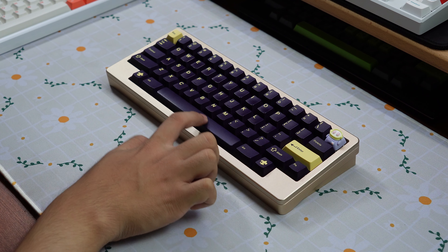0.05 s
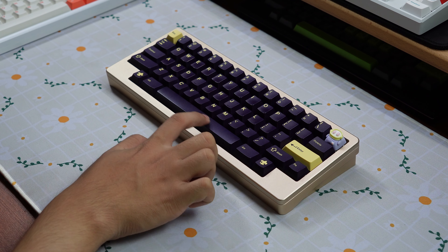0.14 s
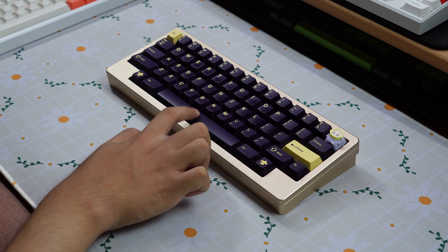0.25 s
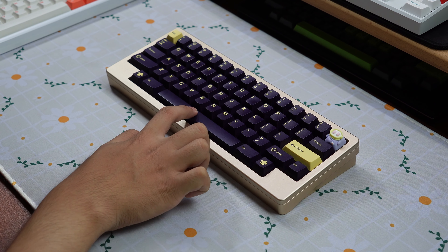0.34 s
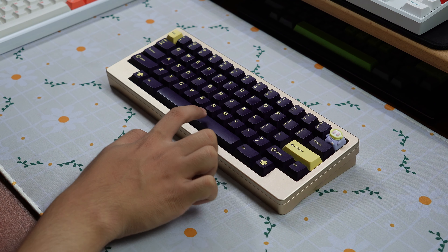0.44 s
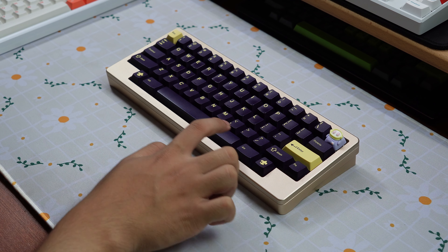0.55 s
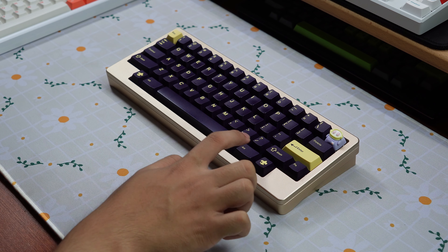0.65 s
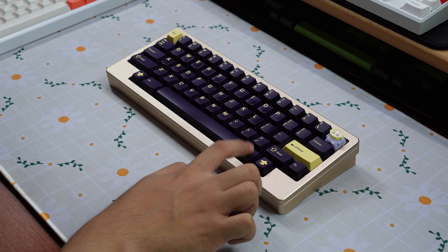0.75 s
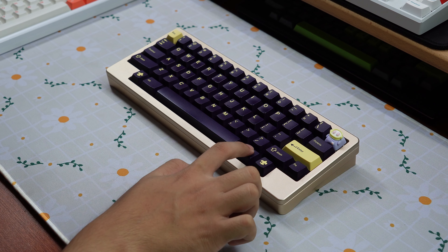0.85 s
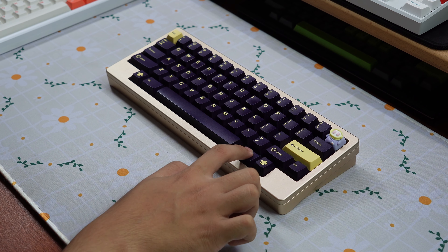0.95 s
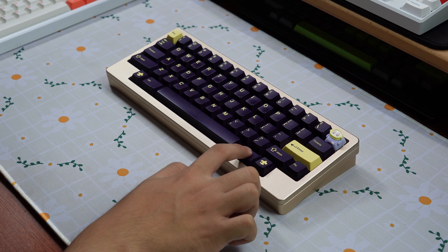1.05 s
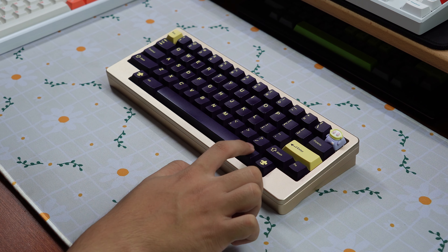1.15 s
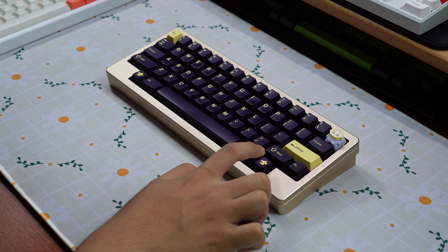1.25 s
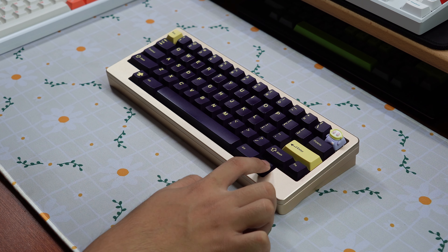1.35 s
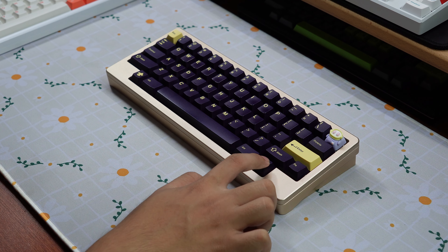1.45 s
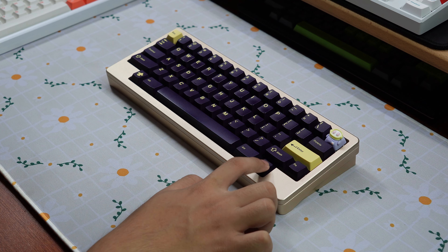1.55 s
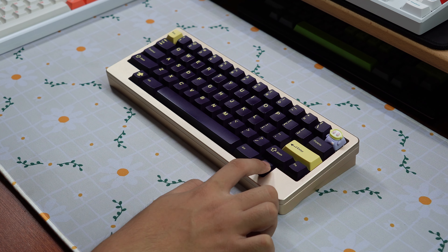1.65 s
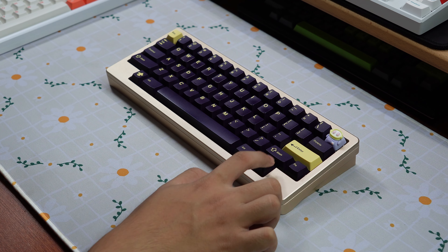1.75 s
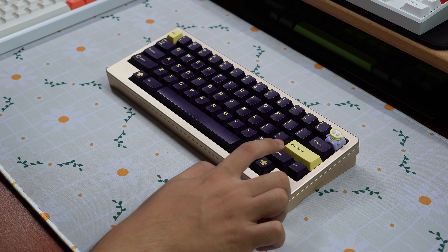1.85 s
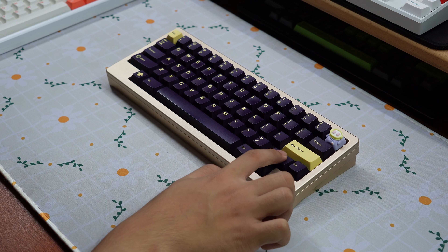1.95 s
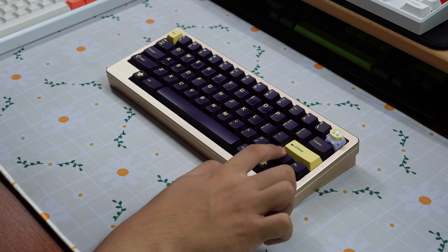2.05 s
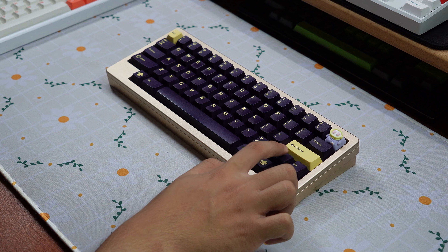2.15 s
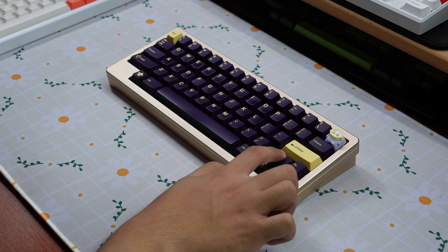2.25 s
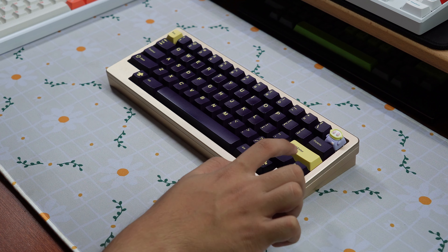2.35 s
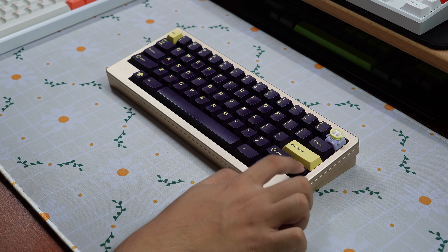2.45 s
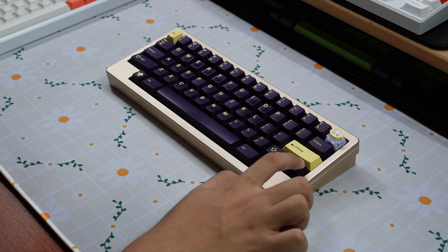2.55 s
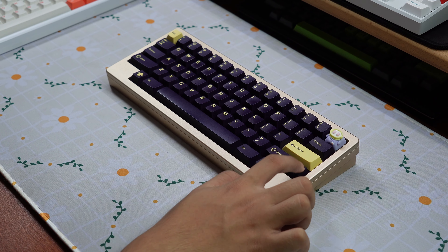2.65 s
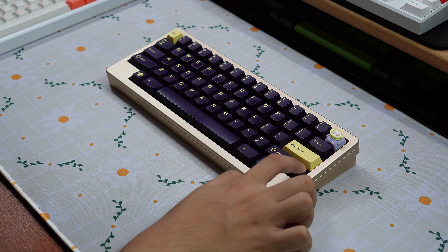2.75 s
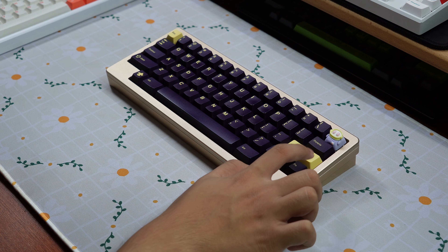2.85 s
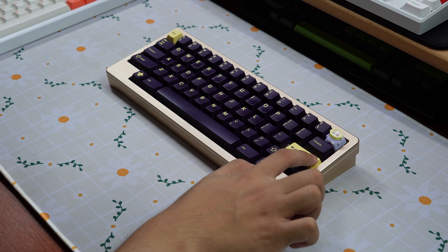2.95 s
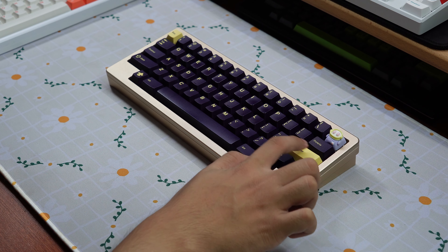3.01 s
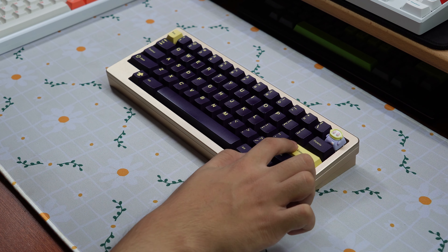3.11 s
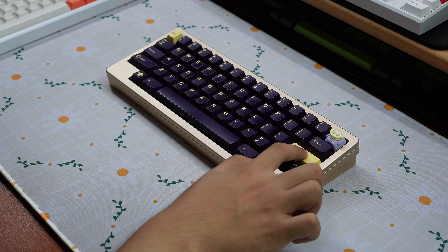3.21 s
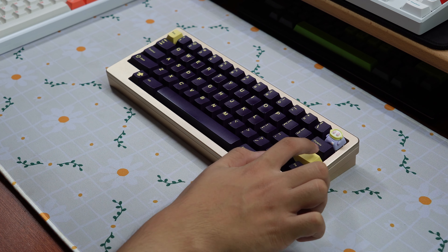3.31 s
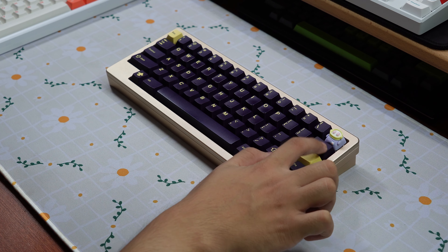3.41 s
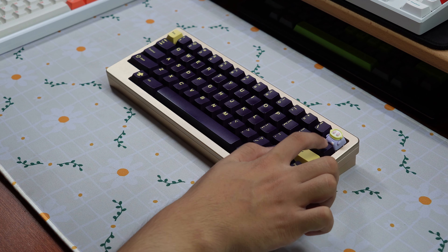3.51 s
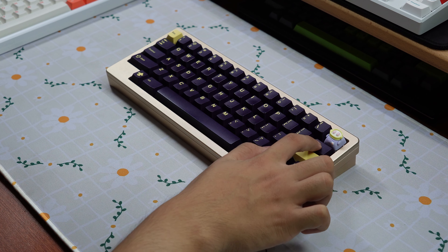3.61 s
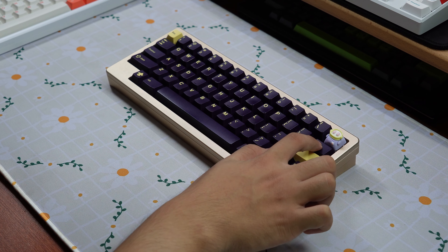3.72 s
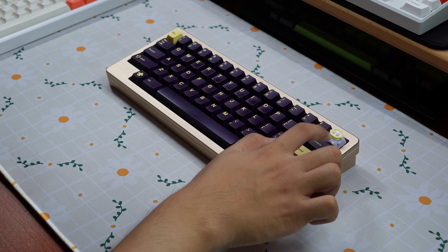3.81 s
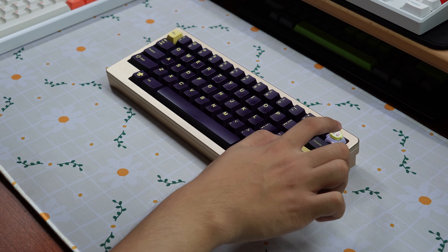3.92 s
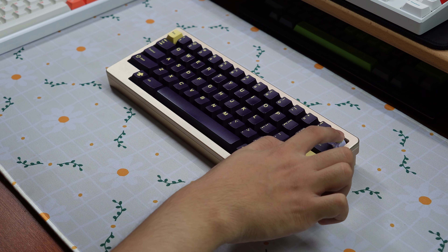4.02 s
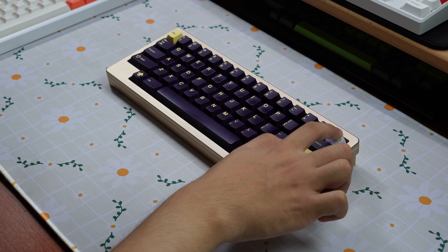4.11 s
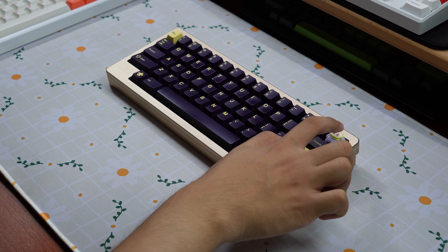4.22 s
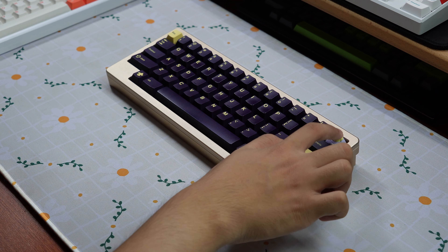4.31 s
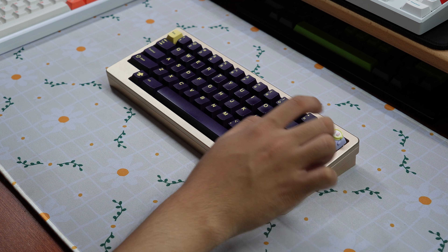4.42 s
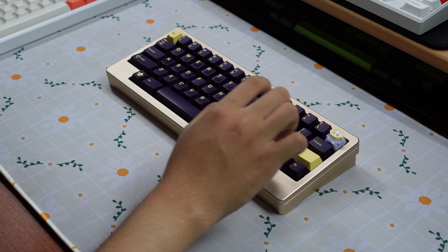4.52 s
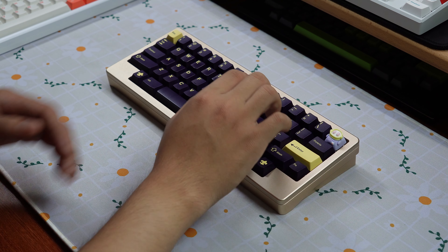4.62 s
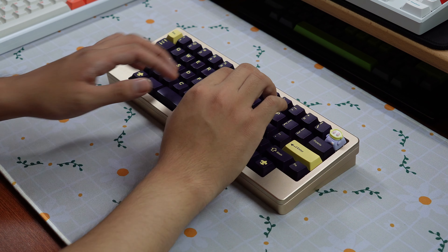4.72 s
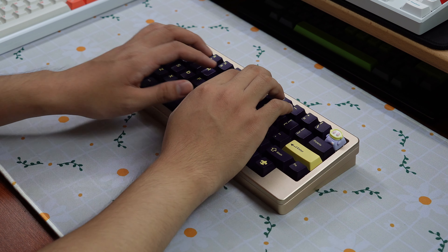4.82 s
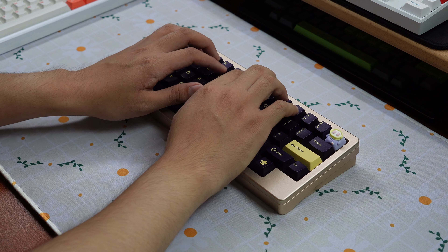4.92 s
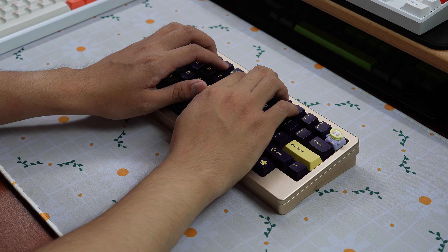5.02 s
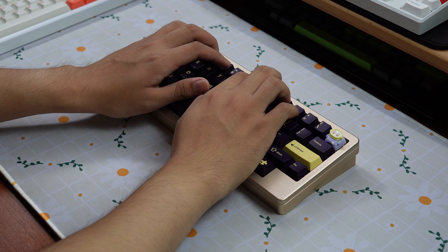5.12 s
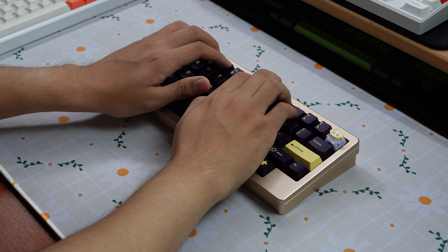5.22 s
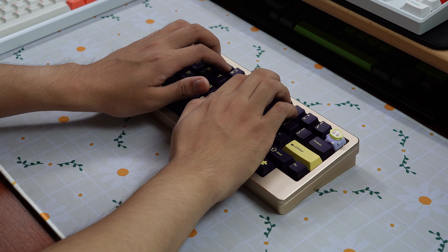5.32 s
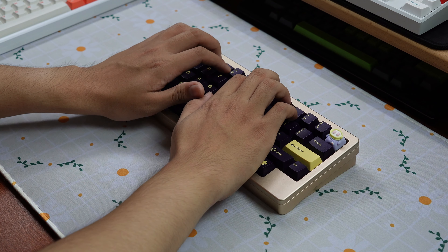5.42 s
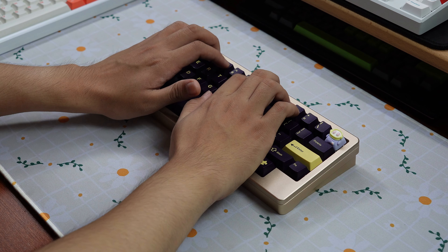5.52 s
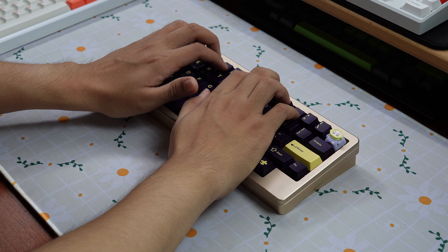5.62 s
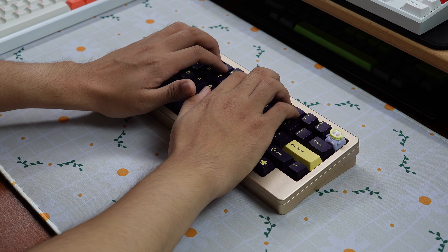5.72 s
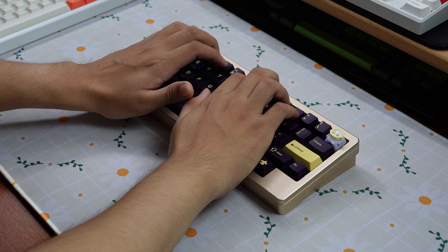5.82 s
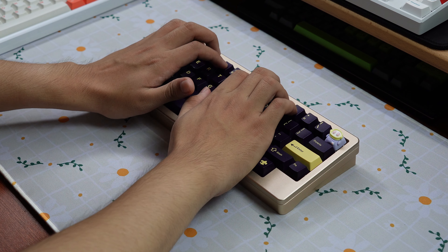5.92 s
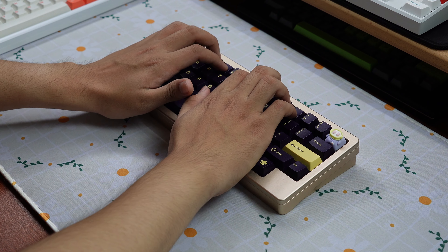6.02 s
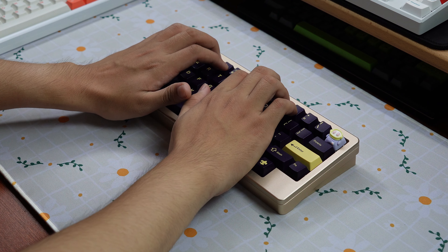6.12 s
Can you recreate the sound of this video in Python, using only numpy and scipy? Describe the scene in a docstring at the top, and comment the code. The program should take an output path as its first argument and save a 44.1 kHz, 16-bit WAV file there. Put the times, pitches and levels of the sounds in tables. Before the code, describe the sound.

Close to a heavy mechanical keyboard in a small room, one finger works along eight large keys, about three firm clack-and-release presses each, with short gaps between keys. Tone and loudness change from key to key, the last being faint. After a pause with a barely audible brush of forearms, two hands type a fast, lighter rattle to the end. Low distant engines and hum lie underneath.

```python
"""One finger taps eight large keys of a heavy mechanical keyboard in turn, three presses and releases each
(four on the first, whose first press lands just before the start), over far engines, a low drone, air and hum.
Then the forearms brush the mat, fingertips settle, and both hands rattle quickly over the letters.
A landing is a noisy contact that excites resonances of cap, stem, housing and case, plus a desk thump;
the small room adds echoes and a diffuse tail. Engines and hum are tones with noise; the rest is filtered noise."""
import sys
import numpy as np
from scipy import signal
from scipy.fft import rfft, irfft
from scipy.io import wavfile
from scipy.ndimage import uniform_filter1d

SR = 44100
rng = np.random.default_rng(int(sys.argv[2]) if len(sys.argv) > 2 else 0)


def generate_wav(sig):
    """Save sig (samples, or channels by samples) to the path in sys.argv[1] as 16-bit PCM at SR."""
    pcm = np.round(np.clip(np.atleast_2d(sig).T, -1, 1) * 32767).astype(np.int16)
    wavfile.write(sys.argv[1], SR, pcm)


N = 271656


def gain_of(db):
    """Decibel law: amplitude ratio of a level in dB."""
    return 10 ** (np.asarray(db) / 20)


def evened(x):
    """Energy normalisation: scales to rms 1."""
    return x / np.sqrt(np.mean(x ** 2) + 1e-20)


def topped(x):
    """Peak normalisation: scales to peak 1."""
    return x / (abs(x).max() + 1e-20)


def read_spectrum(points, hz):
    """Log-frequency interpolation between the points of a spectrum."""
    f, value = np.transpose(points)
    return np.interp(np.log(hz + 1), np.log(f + 1), value)


def coloured_noise(points):
    """Spectral shaping: white noise filtered to the given spectrum, rms 1."""
    hz = np.fft.rfftfreq(N, 1 / SR)
    spectrum = rfft(rng.standard_normal(N)) * gain_of(read_spectrum(points, hz))
    return evened(irfft(spectrum, N))


def resonate(x, hz, width_hz):
    """Damped resonance: a two-pole filter whose pole radius sets the bandwidth."""
    r = np.exp(-np.pi * width_hz / SR)
    return signal.lfilter([1, 0, -1], [1, -2 * r * np.cos(2 * np.pi * hz / SR), r * r], x)


def ring(modes, t):
    """Modal superposition: sines that each die exponentially after a blow."""
    return sum(gain_of(db - 60 * t / t60) * np.sin(2 * np.pi * hz * t) for hz, db, t60 in modes)


def blurred_click(peaks, size=1024):
    """Power addition: a short zero-phase click whose power spectrum sums humps (Hz, width Hz, dB)."""
    hz = np.fft.rfftfreq(size, 1 / SR)
    power = sum(gain_of(2 * db) / (1 + (2 * (hz - f) / w) ** 2) ** 2 for f, w, db in peaks)
    click = np.roll(irfft(np.sqrt(power)), 100)[:400]
    return click * signal.windows.tukey(400, .3)


def landings():
    """Alternation of travel: per stroke, its key and that key's earlier landings (even: down, odd: up)."""
    key = [sum(k[0] <= row[0] for k in KEY_RESONANCES) - 1 for row in STROKES]
    return [(k, key[:n].count(k)) for n, k in enumerate(key)]


# resonances of the key in use; the last row serves all the letters:
# start_s [s], hollow_hz [Hz], ring_hz [Hz], sizzle_hz [Hz], spot_hz favoured by the case here [Hz]
KEY_RESONANCES = [(-1, 1750, 6200, 12000, 1100), (.7, 1700, 6300, 9500, 950), (1.3, 1900, 6000, 10700, 800),
                  (1.9, 1800, 6500, 11700, 1000), (2.45, 1850, 6000, 10500, 750),
                  (2.95, 1750, 6500, 11800, 720), (3.4, 1800, 6200, 10500, 1250),
                  (4.01, 2300, 5500, 7900, 900), (4.8, 2450, 5500, 12000, 1040)]
# how strongly each key sends its resonances round the room, before fixed trims:
# hollow_db [dB], ring_db [dB], sizzle_db [dB], clatter_db [dB]
KEY_SPREAD = [(-0.5, -0.5, -11.5, 9.5), (0.5, 8, -3, 5), (2, -9, -12.5, 3), (2, 14.5, -3.5, 7),
              (0.5, -6, -8.5, 4), (1, 14.5, -3, 5.5), (1, -8.5, -7, 3), (-2.5, -22, -4, 4),
              (2, -12, -15, 6.5)]
# breadth of each key's hollow resonance: width_hz [Hz]
HOLLOW_WIDTH_HZ = [930, 700, 560, 600, 560, 595, 700, 900, 700]
# how each key lands going down: knock_db of the case for a blow of middle strength, before trims [dB],
# stem_hz before scatter [Hz], desk_db relative to the stroke, before scatter [dB], rattle_ms before scatter [ms]
LANDING_DOWN = [(-30, 2960, -19.5, 2.2), (-28, 5860, -22, 2.2), (-35.5, 5800, -28, 0.84),
                (-31.5, 6400, -27, 2.4), (-45, 5500, -55, 0.73), (-30.5, 6600, -30, 2.3),
                (-38, 2900, -30, 0.45), (-26.5, 3100, -34, 2), (-26, 3340, -13.5, 4.1)]
# how each key lands coming up: knock_db [dB], stem_hz [Hz], desk_db [dB], rattle_ms [ms], as above
LANDING_UP = [(-23.5, 3000, -15.5, 5.4), (-24, 5830, -21, 1.9), (-28.5, 6440, -28, 2),
              (-31.5, 4230, -20, 3.3), (-37, 2000, -53, 1.7), (-27, 3340, -28, 2), (-31, 5700, -26.5, 1.3),
              (-29, 7200, -8, 1.8), (-24, 6090, -14, 4)]
# modes of the case: pitch_hz [Hz], relative level_db [dB], t60_s [s]
CASE_MODES = [(711, -20, 0.032), (800, 0, 0.022), (1099, 2, 0.035), (1200, 2, 0.03), (1295, 15, 0.012)]
# modes of the desk: pitch_hz [Hz], relative level_db [dB], t60_s [s]
DESK_MODES = [(88, -9, 0.033), (124, -3.5, 0.05), (191, -5, 0.019), (365, -45.5, 0.024)]
# resonances of steel parts in the keys: pitch_hz [Hz], width_hz [Hz]
STEEL_PARTS = [(6100, 290), (7100, 450), (9840, 300), (12000, 400)]
# how much each key stirs them: one column per steel part, added to the stroke's stem_db [dB]
STEEL_DB = [(14, 10, 0, 4), (33, 28, 2, 2), (12, 8, 4, 2), (20, 20, 6, 16), (10, 12, 4, 2), (14, 14, 2, 4),
            (32, 20, 12, 9), (8, 12, -2, 0), (12, 12, 2, 8)]
MIDDLE_DB, KNOCK_FOLLOWS = -20, 0.37  # middle blow, dB; share of a stronger blow that reaches the case
FIRST_THUMP_DB = 6  # the hand arriving at a new key jolts the desk more
SCATTER_DB, SCATTER_SHARE = 1, 0.14  # knock and thump, dB; rattle length, log ratio
NOTE_SCATTER, LETTER_SCATTER = .03, .2  # stem note, log ratio: one key nearly keeps it, the letters differ


def stroke(row, key, before, noise, lead_s=.01):
    """Impact excitation: the stem slides, lands and rattles; gives start sample, near sound and room feed."""
    s, peak_db, cap_hz, stem_db, tick_db = row
    knock_db, stem_hz, desk_db, rattle_ms = (LANDING_UP if before % 2 else LANDING_DOWN)[key]
    _, hollow_hz, ring_hz, sizzle_hz, spot_hz = KEY_RESONANCES[key]
    hollow_db, ring_db, sizzle_db, clatter_db = KEY_SPREAD[key]

    # no two landings alike
    knock_chance, thump_chance, note_chance, rattle_chance = noise[1, -4:]
    case_db = knock_db + KNOCK_FOLLOWS * (peak_db - MIDDLE_DB) + SCATTER_DB * knock_chance - peak_db
    desk_db = desk_db + SCATTER_DB * thump_chance + FIRST_THUMP_DB * (before == 0)
    is_letter = key == len(KEY_RESONANCES) - 1
    stem_hz = stem_hz * np.exp((LETTER_SCATTER if is_letter else NOTE_SCATTER) * note_chance)
    rattle_ms = rattle_ms * np.exp(SCATTER_SHARE * rattle_chance)

    # the contact noise: sliding, rattle and one sharp blow
    lead = round(lead_s * SR)
    clock = np.arange(len(noise[0])) / SR
    t = np.maximum(clock - lead_s, 0)
    sliding = clock / lead_s * (t == 0)  # friction grows until the landing
    rattle_s = max(rattle_ms, .2) / 1000
    settling = np.exp(-t / rattle_s) + 0.15 * np.exp(-t / 0.004)  # small bounces linger after the rattle
    contact = (1 - np.exp(-t / 0.00041)) * settling * noise[0] ** 3 * 1.9  # the cube makes it spiky
    contact += gain_of(-33) * sliding * noise[1]
    contact[lead + 8] += 2.5

    # the cap swings a few cycles and is damped at once by the finger and the foam
    swing = (1 - np.exp(-t / 0.00066)) * np.exp(-(t / 0.0017) ** 2) * np.sin(2 * np.pi * cap_hz * t)
    cap = topped(swing) + 0.4 * topped(resonate(contact, cap_hz * 1.19, 310))
    knocked = signal.fftconvolve(contact, ring(CASE_MODES, t[t > 0]))[:len(t)]
    case = topped(resonate(knocked, spot_hz, 446.4))
    stem = 1.63 * topped(resonate(contact, stem_hz, 420)) + 2.77 * topped(resonate(contact, 2800, 3500))
    tick = topped(resonate(contact, sizzle_hz, 1300)) + 1.7 * topped(resonate(contact, 11000, 4900))
    desk = topped((1 - np.exp(-t / 0.0016)) ** 2 * ring(DESK_MODES, t))

    near = gain_of(-1.5) * cap + gain_of(case_db - 2.5) * case + gain_of(desk_db) * desk
    first = 0.31 + 0.49 * np.exp(-t / 0.00091)  # the first contact is the brightest
    near += first * gain_of(stem_db + 5.5) * stem
    near += first ** 2 * gain_of(tick_db - 3.0) * tick

    # off to the sides the rattle blurs and the key's own resonances remain
    peaks = [(hollow_hz, HOLLOW_WIDTH_HZ[key], hollow_db + 26.5),
             (ring_hz, 1100, stem_db + ring_db + 12.5),
             (3500, 6000, stem_db + clatter_db + 21),
             (sizzle_hz, 1100, tick_db + sizzle_db + 24.5),
             (9000, 9000, tick_db + clatter_db + 3.5)]
    peaks += [(f, w, db + stem_db) for (f, w), db in zip(STEEL_PARTS, STEEL_DB[key])]
    far = gain_of(case_db - 8) * case
    far[lead:][:400] += blurred_click(peaks)
    return round((s - lead_s + 0.00031) * SR), gain_of(peak_db) * np.array([near, far])


# every landing of a key, down on the plate and up at its stop in turn: start_s [s], level_db before trims [dB],
# pitch_hz of the cap [Hz], stem_db and tick_db of stem ring and housing tick, relative, before trims [dB]
STROKES = [(-.008, -7, 2100, -18, -20.5), (0.0681, -18, 1680, -13, -27), (0.123, -6.5, 1680, -13, -21),
           (0.205, -16.5, 1720, -17.5, -30), (0.2678, -8, 1860, -17, -14), (0.3316, -17, 1720, -15.5, -29),
           (0.391, -4.5, 1860, -22.5, -15), (0.4842, -19, 1640, -11, -22), (0.83, -16.5, 2100, -9.5, -7),
           (0.9108, -24.5, 1700, -4.5, -18), (0.9677, -21, 1620, -6, -31), (1.0521, -27.5, 1670, -3.5, -26),
           (1.1119, -23, 1620, -6.5, -6), (1.204, -21, 1910, -2.5, -20), (1.4087, -14.5, 1980, -17, 6),
           (1.494, -20, 1970, -9.5, 7), (1.5549, -15, 1970, -17, -8), (1.6347, -21.5, 1960, -4.5, 8),
           (1.6926, -15.5, 1950, -18.5, 5.5), (1.7958, -17.5, 1920, -10, 3), (1.9809, -15, 1864, -7.5, -11),
           (2.0558, -16.5, 2020, -9.5, -11), (2.1279, -19.5, 1847, -11.5, -9), (2.1968, -17, 1900, -9, -6),
           (2.256, -19, 1997, -9.5, -13), (2.3527, -19, 1885, -6, -17), (2.5187, -7.5, 1950, -21, -3.5),
           (2.5849, -12, 1850, -15.5, -12), (2.648, -11.5, 1926, -24, -3.5),
           (2.7267, -12.5, 2140, -13.5, -7), (2.7826, -12, 1950, -22.5, -5), (2.8669, -11.5, 2020, -16, -7),
           (2.9898, -12, 1793, -14, -12), (3.0579, -14, 1900, -12.5, -25), (3.1251, -26, 1900, -4, 0),
           (3.2006, -23, 1980, -7.5, -13), (3.2581, -16.5, 1877, -15.5, -11),
           (3.3411, -22.5, 1950, -11.5, -28), (3.4961, -16, 1952, -8.5, -13),
           (3.5679, -13.5, 1940, -12, -8), (3.6382, -21, 1900, -9.5, -23), (3.708, -22, 1860, -5.5, -27),
           (3.7598, -20, 1947, -8.5, -22), (3.8431, -18, 2005, -6.5, -36), (4.0668, -24.5, 2040, -5.5, -6),
           (4.1315, -32.5, 2140, 3.5, 8), (4.1959, -28.5, 2140, -14, 3), (4.2599, -31, 2600, 2, 8),
           (4.334, -30.5, 2080, -3.5, -5), (4.3949, -31, 2550, 0, 7), (5.2279, -30.5, 1440, -4.5, -19),
           (5.272, -25.5, 2420, -8, -5), (5.312, -34.5, 2640, -1, -8), (5.3218, -30.5, 2160, -0.5, 8),
           (5.385, -38.5, 2300, -9, -15), (5.3947, -44, 1440, 0, -16), (5.4021, -34.5, 2130, -3.5, -12),
           (5.416, -40, 2250, 0, -20), (5.439, -22, 2360, -10.5, -23), (5.4447, -46, 2080, 2, -7),
           (5.4651, -28, 2490, -5, -1), (5.508, -29, 2140, -2.5, -11), (5.5243, -32.5, 2230, -7, -14),
           (5.5432, -30, 2196, -9.5, -7), (5.5538, -28, 1360, -16, -19), (5.5672, -36.5, 1400, 2, -2),
           (5.5828, -28, 2220, -7, -6), (5.5908, -35, 2280, 4, -14), (5.6111, -27, 2450, -3, -14),
           (5.6182, -25.5, 2390, -7.5, -10), (5.6529, -37, 2260, -2, -5), (5.663, -33.5, 2320, 1, 2),
           (5.689, -26, 2410, -6.5, 1), (5.7014, -36, 2310, -9, -10.5), (5.7084, -32, 2110, -8, -6),
           (5.7249, -23.5, 2295, -7, -2), (5.7643, -32.5, 2700, -13, -17), (5.7843, -25, 2300, -1, -1),
           (5.796, -36, 2520, -8, -10), (5.8082, -29.5, 1750, -3, -16), (5.8252, -26.5, 2360, -3, 11),
           (5.8556, -23, 2280, -6, -15), (5.8645, -24.5, 2310, -7, -12), (5.8738, -40, 1410, -1, -16),
           (5.8909, -30, 2670, -5, -13), (5.9119, -37, 2670, 12, -6), (5.9216, -32.5, 2140, -1, 3),
           (5.9509, -36, 2280, -0.5, -9), (5.9644, -40, 2380, -8, -9), (5.983, -33, 2450, 2, 3),
           (5.9908, -22.5, 2230, -9.5, -8), (6.0182, -24.5, 1430, -6.5, -9), (6.0378, -25, 2570, -8, 5),
           (6.0899, -29.5, 2240, -9, -15), (6.095, -30.5, 1430, -4, -21), (6.109, -22.5, 2570, -7.5, 4),
           (6.1366, -38, 1450, -3, -13), (6.1538, -29.5, 2320, -11, -17)]
# coming up, the far end of each cap stops a moment later: level_db of that repeat, one per key [dB]
BAR_BOUNCE_DB = [-11, -26, -25, -19, -17, -18, -24, -23, -25]
BAR_BOUNCE_S = .0055


def keys():
    """Superposition of impacts: all strokes, as near sound and as feed to the room, from 1 s before the start."""
    out = np.zeros((2, N + 2 * SR))
    noise = rng.standard_normal((len(STROKES), 2, 6000))
    for row, (key, before), chance in zip(STROKES, landings(), noise):
        at, sound = stroke(row, key, before, chance)
        out[:, SR + at:SR + at + len(sound[0])] += sound
        if before % 2:
            at += round(BAR_BOUNCE_S * SR)
            bounce = stroke(row, key, before, chance[::-1])[1]
            out[:, SR + at:SR + at + len(sound[0])] += gain_of(BAR_BOUNCE_DB[key]) * bounce
    return out[:, :SR + N]


# echoes off desk top, shelf and walls: delay_ms [ms], level_db before the low-pass filters [dB]
ECHOES = [(4.5, -17.5), (15.8, -18), (23, -26), (30.5, -22.5), (35, -30)]
# reverberation time of the room: pitch_hz [Hz], t60_s [s]
REVERB_TIMES = [(300, 0.31), (1000, 0.64), (2000, 0.55), (5000, 0.48), (10000, 0.43), (15000, 0.7)]
BUILD_S = 0.0085  # the diffuse tail takes a moment to fill the room


def room(x):
    """Reverberation: early echoes, then three sparse tails fed in turn, each band dying at its own speed."""
    # soft furnishing swallows the top
    x = signal.sosfilt(signal.butter(3, 13500, fs=SR, output="sos"), x)
    early = np.zeros(2000)
    for ms, db in ECHOES:
        early[round(ms * SR / 1000)] += gain_of(db)
    echoes = signal.fftconvolve(x, early)[:len(x)]
    out = signal.sosfilt(signal.butter(1, 4000, fs=SR, output="sos"), echoes)
    turn = np.arange(len(x)) / SR * 2 * np.pi * 2.5  # the feed goes round 2.5 times a second
    for k in range(3):
        taps = np.zeros(SR // 2)
        at = np.arange(200, len(taps) - 20, 14)
        taps[at + rng.integers(0, 14, len(at))] = rng.standard_normal(len(at))
        taps *= 1 - np.exp(-np.arange(len(taps)) / SR / BUILD_S)
        hz, t, z = signal.stft(taps, SR, nperseg=256)
        decay = gain_of(-60 * t / read_spectrum(REVERB_TIMES, hz)[:, None])
        tail = signal.istft(z * decay, SR, nperseg=256)[1]
        share = np.sqrt(2 / 3) * np.cos(turn + k * 2 * np.pi / 3)
        out += gain_of(-14) * signal.fftconvolve(x * share, tail / np.linalg.norm(tail))[:len(x)]
    return out


# far engines: start_s [s], deep_hz [Hz], deep_db [dB], upper_hz [Hz], upper_db [dB],
# third_db of the third multiple of the deep tone [dB]
ENGINE_TONES = [(0.0, 31.92, -65, 65.0, -67, -73), (0.33, 37.3, -59, 72.1, -59, -59),
                (0.93, 34.8, -57.5, 76.9, -56, -67), (1.18, 32.87, -52, 54.1, -58, -66),
                (1.3, 32.63, -42, 58.34, -48.5, -47), (2.06, 33.22, -44, 68.7, -43.5, -58),
                (2.61, 33.5, -52.5, 69.8, -49, -57.5), (2.83, 31.66, -44, 54.3, -56, -62),
                (2.97, 31.92, -49, 70.1, -51, -60), (3.28, 30.97, -39, 60.05, -51, -54),
                (3.53, 30.05, -45, 60.4, -42, -53), (3.81, 30.3, -66, 77.5, -56, -59),
                (3.96, 29.63, -53, 59.3, -69, -62.5), (5.03, 33.6, -47, 53, -59, -68),
                (5.21, 33.0, -49.5, 69.2, -53, -54.5), (5.75, 32.8, -62, 68.8, -57, -54),
                (5.95, 35.65, -51, 57.3, -53, -49.5), (6.16, 36.3, -52, 62.6, -59, -49)]
ENGINE_FUZZ = 0.59  # share of noise round each tone


def engines():
    """Narrow-band modulation: low wandering tones, each blurred by slow noise on its two phases."""
    s, *columns = np.transpose(ENGINE_TONES)
    t = np.arange(N) / SR
    deep_hz, deep_db, upper_hz, upper_db, third_db = (np.interp(t, s, c) for c in columns)
    out = np.zeros(N)
    for hz, db in ((deep_hz, deep_db), (upper_hz, upper_db), (deep_hz * 3, third_db)):
        slow = uniform_filter1d(uniform_filter1d(rng.standard_normal((2, N)), 3000), 3000)
        in_phase, quadrature = ENGINE_FUZZ * evened(slow[0]), ENGINE_FUZZ * evened(slow[1])
        turn = 2 * np.pi * np.cumsum(hz) / SR
        out += gain_of(db) * evened((1 + in_phase) * np.cos(turn) + quadrature * np.sin(turn))
    return out


# a low drone from outside fades away unevenly: start_s [s], level_db [dB]
DRONE_LEVEL = [(0.0, -48.5), (0.39, -46), (1.66, -53.5), (2.01, -47), (4.56, -60), (6.16, -57)]


def drone():
    """Resonant filtering: noise in three low bands, each passed twice through its resonance."""
    noise = rng.standard_normal(N)
    s, db = np.transpose(DRONE_LEVEL)
    bands = np.zeros(N)
    for hz, width_hz, band_db in ((160.2, 88, 9), (217, 250, -0.5), (324, 130, -8.0)):
        bands += gain_of(band_db) * evened(resonate(resonate(noise, hz, width_hz), hz, width_hz))
    return gain_of(np.interp(np.arange(N) / SR, s, db)) * evened(bands)


# spectrum of the room air: pitch_hz [Hz], relative level_db [dB per Hz]
AIR_SPECTRUM = [(12, -28), (20, 6), (49, -1.5), (77, -17), (134, -3.5), (154, -12.5), (172, -20),
                (347, -17), (527, -47), (590, -22.5), (678, -28.5), (3530, -38), (16000, -63)]
AIR_DB = -50


def air():
    """Broadband turbulence: steady noise, strongest in the bass."""
    return gain_of(AIR_DB) * coloured_noise(AIR_SPECTRUM)


HUM_HZ, HUM_WIDTH_HZ, HUM_DB = 119.35, 5.3, -49.5


def hum():
    """Beating of a tone with narrow-band noise: a mains hum that wavers."""
    t = np.arange(N) / SR
    waver = evened(resonate(rng.standard_normal(N), HUM_HZ, HUM_WIDTH_HZ))
    return gain_of(HUM_DB) * evened(np.sin(2 * np.pi * HUM_HZ * t) + 0.4 * waver)


# the contact leaf of the switch ticks just before a landing
LEAF_DOWN_S, LEAF_UP_S, LEAF_JITTER_S = 0.004, 0.0087, 0.00091
LEAF_DOWN_DB, LEAF_UP_DB, LEAF_SCATTER_DB = -44, -42, 1.5


def leaf():
    """Stiff-spring resonance: tiny bright ticks of spring metal, from bursts of noise."""
    out, t = np.zeros(N + 300), np.arange(300) / SR
    chances = rng.standard_normal((len(STROKES), 302))
    for row, (key, before), chance in zip(STROKES[1:], landings()[1:], chances):
        lead_s, db = (LEAF_UP_S, LEAF_UP_DB) if before % 2 else (LEAF_DOWN_S, LEAF_DOWN_DB)
        burst = chance[2:] * np.exp(-t / 0.0018)
        bright = topped(resonate(burst, 12500, 4000)) + 0.4 * topped(resonate(burst, 4000, 4000))
        at = round((row[0] - lead_s + LEAF_JITTER_S * chance[0]) * SR)
        out[at:][:300] += gain_of(db + LEAF_SCATTER_DB * chance[1]) * bright
    return out[:N]


# fingertips settle on the letters: start_s [s], level_db [dB]
SETTLING_TOUCHES = [(4.929, -60), (5.173, -48), (5.197, -57.5)]
# the fingertip slaps the cap of a new key before pushing it down; SLAP_DB is relative to that press
SLAP_S, SLAP_DB, SLAP_FADE_S, SLAP_HZ = .0105, -26.5, 0.01, 2100


def fingertips():
    """Soft impact: decaying puffs of skin on plastic; a slap is as hard as the press that follows."""
    out, t = np.zeros(N), np.arange(1500) / SR
    touches = [(row[0] - SLAP_S, row[1] + SLAP_DB)
               for row, (key, before) in zip(STROKES, landings()) if key and not before]
    touches += SETTLING_TOUCHES
    for (s, db), noise in zip(touches, rng.standard_normal((len(touches), 1500))):
        burst = noise * np.exp(-t / SLAP_FADE_S)
        puff = topped(resonate(burst, SLAP_HZ, 900)) + 0.39 * topped(resonate(burst, 6000, 9000))
        out[round(s * SR):][:1500] += gain_of(db) * puff
    return out


# forearms brush the mat: start_s [s], level_db before the patchiness [dB]
BRUSH_LEVEL = [(4.52, -79), (4.62, -68.5), (4.8, -71.5), (4.95, -83)]
# spectrum of the brushing: pitch_hz [Hz], relative level_db [dB per Hz]
BRUSH_SPECTRUM = [(530, -36), (900, -6.5), (1150, -9), (3230, -9), (4860, -3), (5410, -10), (6640, -6.5),
                  (16000, -24)]
BRUSH_PATCHY_DB = 1  # cloth catches unevenly


def forearms():
    """Friction noise: coloured noise under a swell whose level flickers."""
    s, db = np.transpose(BRUSH_LEVEL)
    swell_db = np.interp(np.arange(N) / SR, s, db, -120, -120)
    patches = evened(uniform_filter1d(rng.standard_normal(N), 900))
    return gain_of(swell_db + BRUSH_PATCHY_DB * patches) * coloured_noise(BRUSH_SPECTRUM)


def scene():
    """Linear superposition: keys in the room over the rest; a tap just before the start still rings."""
    near, far = keys()
    played = (near + room(far))[SR:]
    background = engines() + drone() + air() + hum()
    return (played + background + leaf() + fingertips() + forearms())[None]


EDGE_HZ = 16900


def record(dry):
    """Low-pass filtering: the microphone rolls off at the top; then the band limit."""
    soft = signal.sosfilt(signal.butter(12, 15800, fs=SR, output="sos"), dry)
    band_limit = signal.firwin(511, EDGE_HZ, window=("kaiser", 9), fs=SR)
    return signal.oaconvolve(soft, band_limit[None], "same")


dry = scene()
out = record(dry)
generate_wav(out)
```